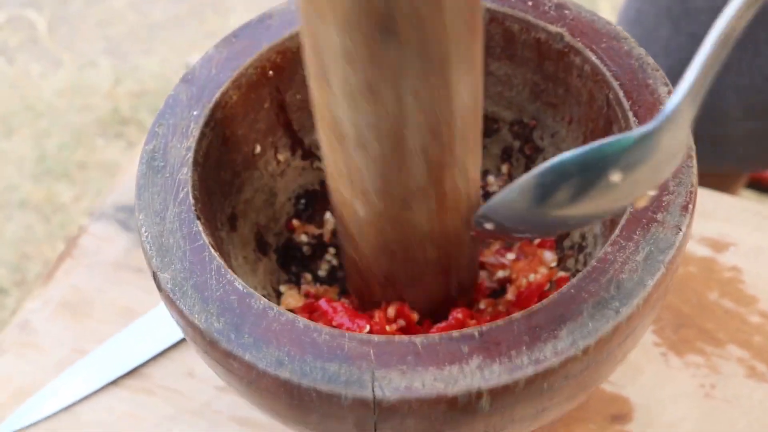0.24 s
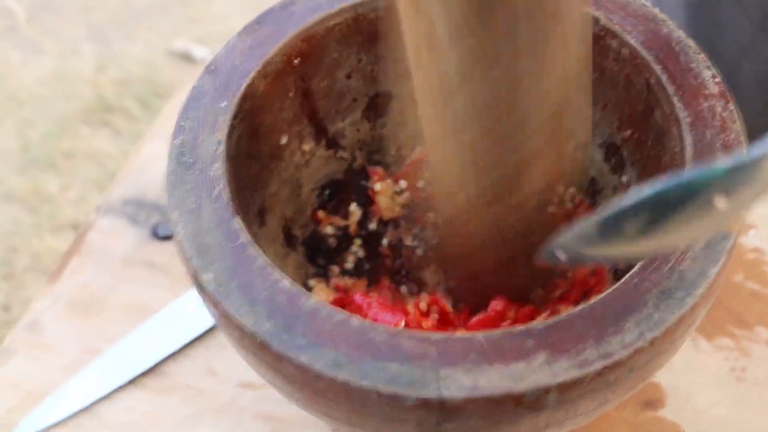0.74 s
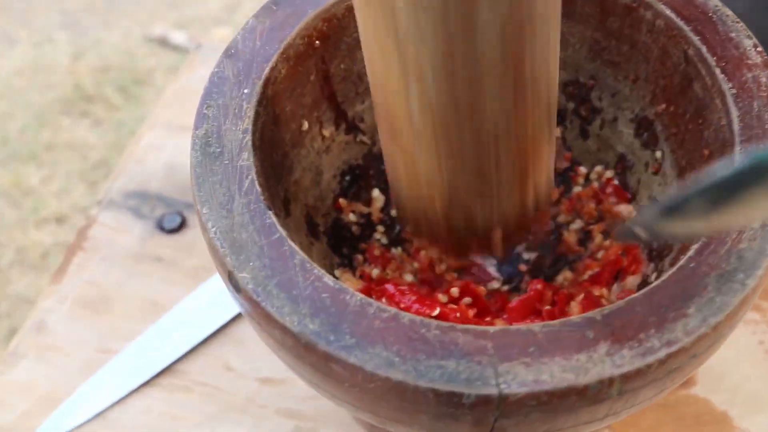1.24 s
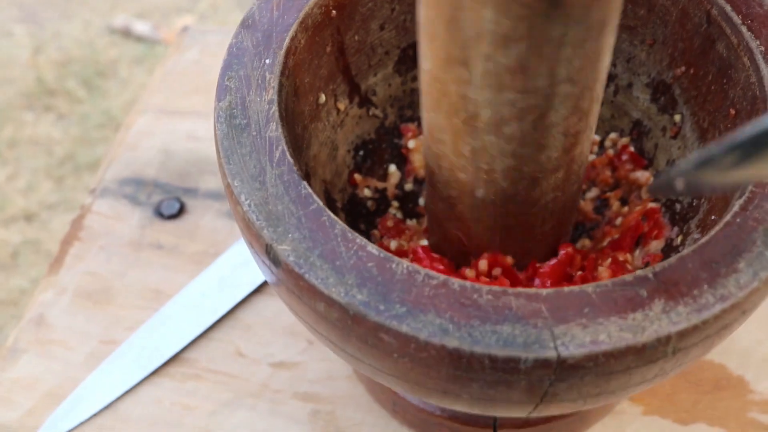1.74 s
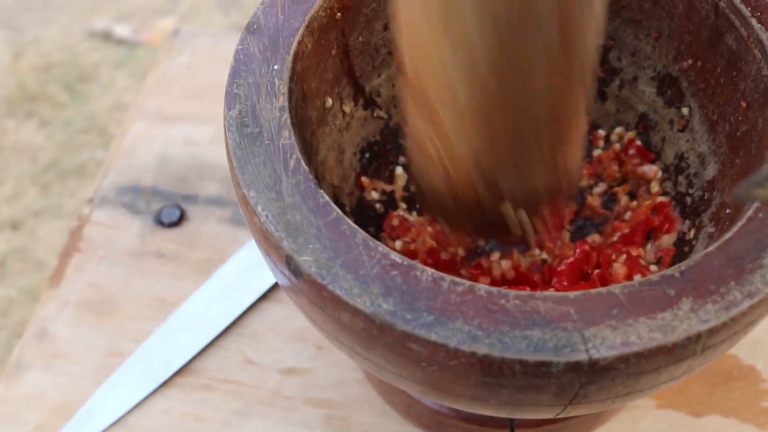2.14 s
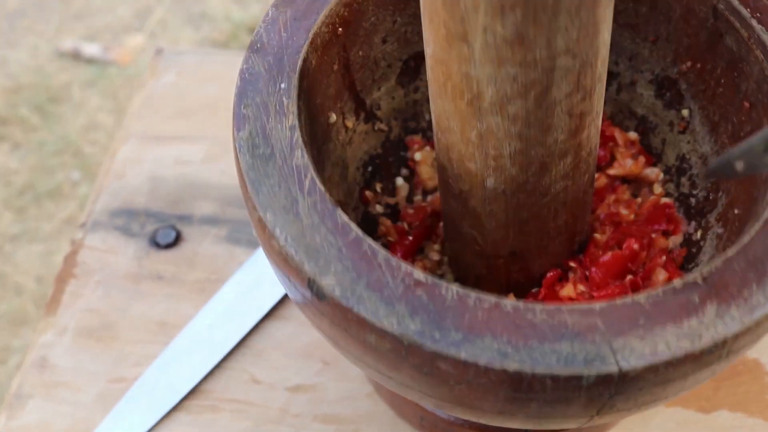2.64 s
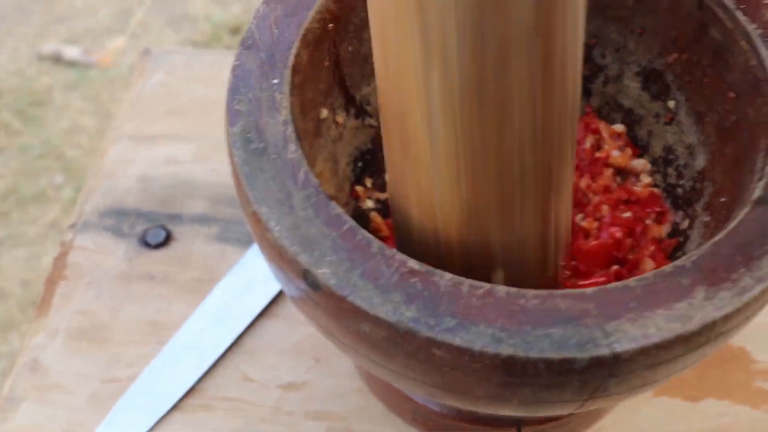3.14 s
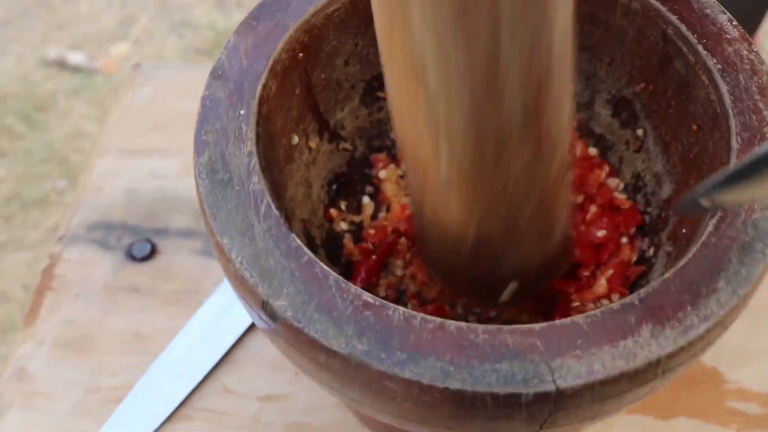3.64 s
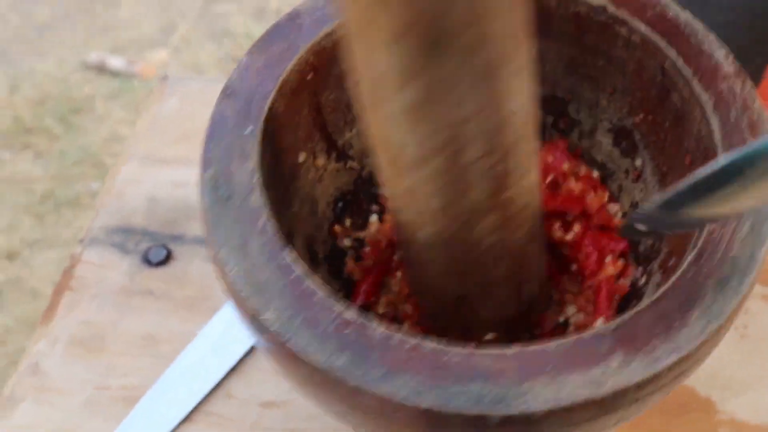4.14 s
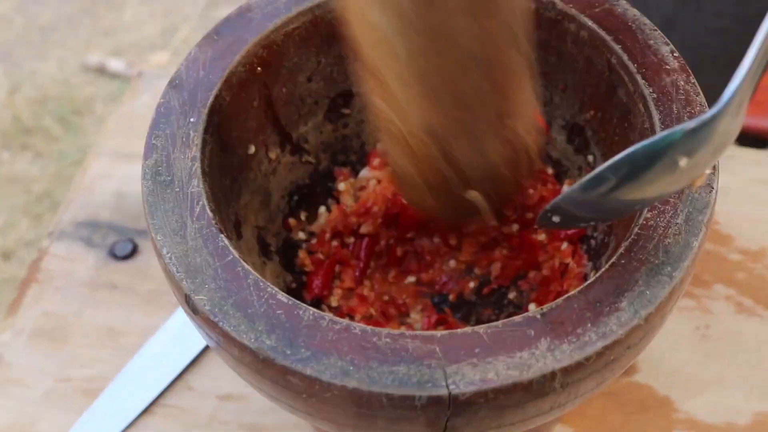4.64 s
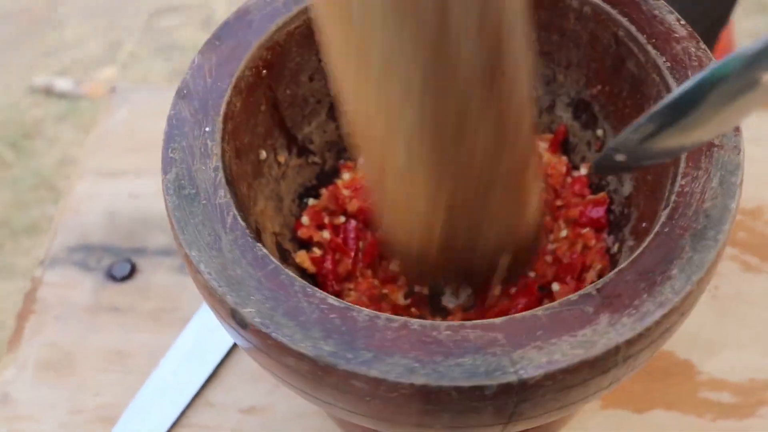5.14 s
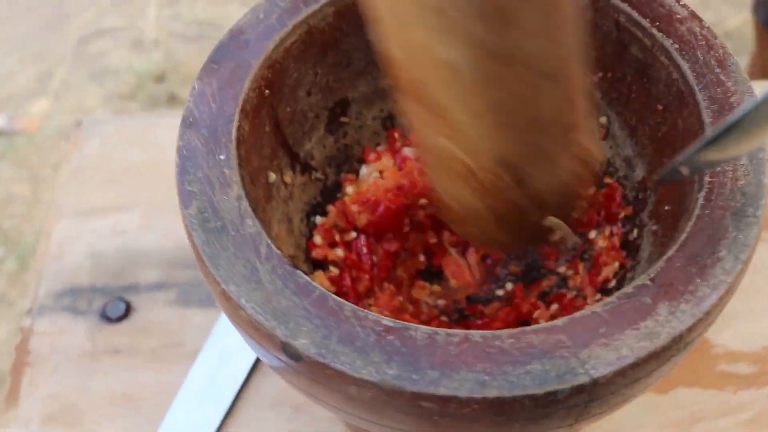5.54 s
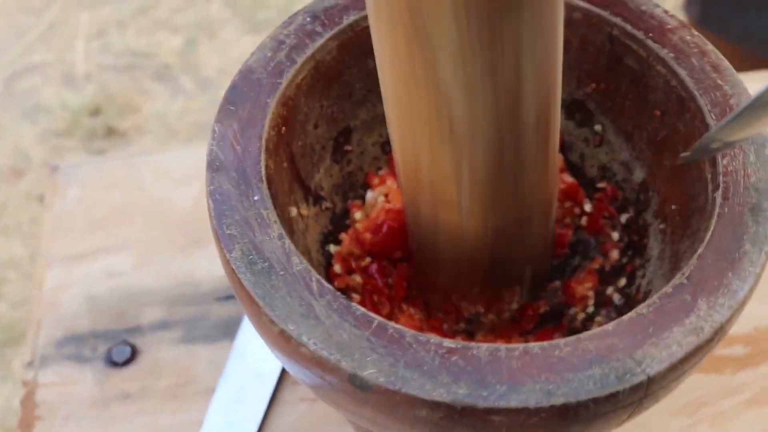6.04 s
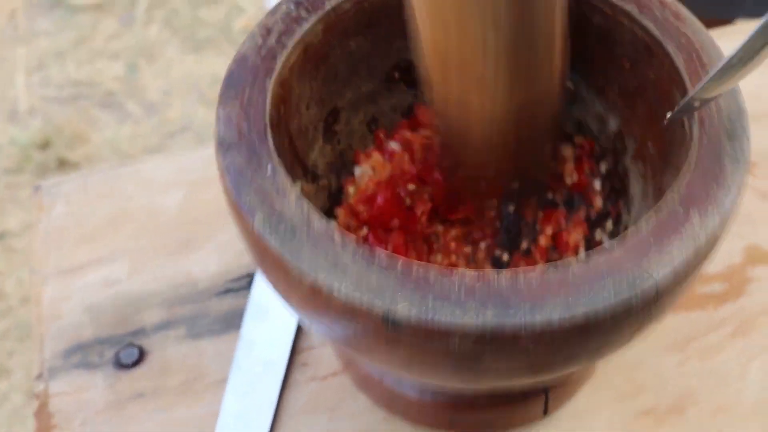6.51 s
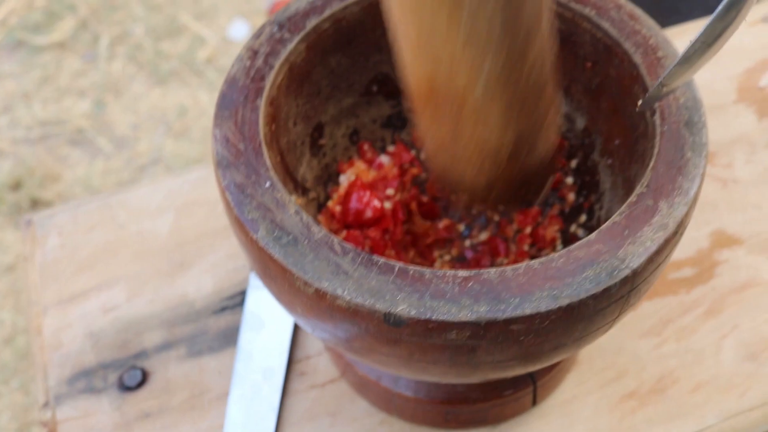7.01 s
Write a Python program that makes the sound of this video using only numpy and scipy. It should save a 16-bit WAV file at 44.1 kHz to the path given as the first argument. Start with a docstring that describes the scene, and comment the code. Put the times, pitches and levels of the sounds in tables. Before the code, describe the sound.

Steady pounding in a wooden bowl: firm, dry knocks at first, then softer, uneven, more grinding strokes, and firmer again near the end. Wet pulp and seeds crackle under each stroke, and a loose blade gives tiny bouncing clinks on the planks. Close stereo microphones outdoors, with little reverberation, faint bird cheeps, a low far engine early on and gentle air noise.

```python
"""On a plank table outdoors, a wooden pestle pounds chilies and garlic in a wooden mortar, heard close up.
Strokes crush wet pulp in filtered crackle; blows ring the modes of bowl and planks; a knife on the planks
rattles in bouncing clinks. Far off, small birds cheep in gliding sines, and an engine drones as a
wavering tone with its octave, then fades into the shaped noise of open air."""
import sys
import numpy as np
from scipy import signal
from scipy.fft import rfft, irfft, next_fast_len
from scipy.io import wavfile
from scipy.ndimage import uniform_filter1d

SR = 44100
rng = np.random.default_rng(int(sys.argv[2]) if len(sys.argv) > 2 else 0)


def gain_from_db(level_db):
    """Convert decibel levels to linear amplitude factors (20 dB per decade)."""
    decades = np.asarray(level_db, float) / 20
    return 10 ** decades


def digitize_waveform(pressure):
    """Quantize a signal to 16-bit integers and store it at the path in sys.argv[1].

    Rows of a 2-D input are taken as channels; values are limited to [-1, 1].
    """
    field = np.atleast_2d(pressure).T
    bounded = np.clip(field, -1, 1)
    quanta = np.round(bounded * 32767).astype(np.int16)
    wavfile.write(sys.argv[1], SR, quanta)


N = 320600  # length in samples

# pestle strokes: start_s, deepest_s, entry_db (above the deepest point), crush_db, grind_db (above crush_db)
STROKES = [(0, -0.014, -4, -69.5, 10.5), (0.283, 0.31, 5.5, -50, -2), (0.579, 0.589, 16, -50.5, -2),
           (0.864, 0.892, -3, -52, -2), (1.186, 1.189, 9, -42.5, -4.5), (1.482, 1.481, 2.5, -41.5, -7.5),
           (1.79, 1.801, 8, -45, -1), (2.084, 2.11, -8, -51, -20), (2.409, 2.435, -17.5, -49.5, -1),
           (2.71, 2.751, -11.5, -47, -5.5), (3.005, 3.048, -22, -44, -2), (3.298, 3.347, -13.5, -46.5, -1),
           (3.604, 3.652, -20.5, -46, 2.5), (3.904, 3.934, -22, -46.5, 7.5), (4.2, 4.223, -10.5, -52.5, 4),
           (4.515, 4.533, -1.5, -52.5, -2.5), (4.807, 4.839, -19, -52.5, -6.5), (5.125, 5.137, 5, -48.5, 1),
           (5.428, 5.458, 1.5, -53, -1.5), (5.742, 5.772, 3.5, -51, 9), (6.03, 6.057, -12.5, -48.5, 4),
           (6.337, 6.347, -9, -49.5, 5), (6.65, 6.675, -0.5, -50, 3), (6.952, 6.978, -2, -50, 8.5),
           (7.246, 7.21, 7, -44.5, 6)]
# resonances of bowl and pestle: pitch_hz, level_db, t60_s
BOWL_MODES = [(450, 0.5, 0.034), (547, 4, 0.031), (681, 4, 0.051), (741.5, 8, 0.037), (843.5, -14, 0.12),
              (1043.4, 2.5, 0.048), (1279.5, -2.5, 0.049), (1505, -6, 0.053), (1777, -4, 0.04),
              (1950, -5.5, 0.01), (2480, -19, 0.035), (2787, -14, 0.035), (3120, -20.5, 0.025)]
# resonances of the table planks: pitch_hz, level_db, t60_s
PLANK_MODES = [(117, -10, 0.033), (203, -3.5, 0.02), (255.3, 12.5, 0.019), (307.6, -1, 0.059)]


def evened(x):
    """Scales to rms 1."""
    return x / np.sqrt(np.mean(x ** 2) + 1e-20)


def read(points, hz):
    """Reads a curve at the given frequencies, on a logarithmic pitch axis."""
    point_hz, value = np.transpose(points)
    return np.interp(np.log(hz + 1), np.log(point_hz + 1), value)


def coloured(x, points, factor=1):
    """Filters x by a spectrum in dB, scaled by the factor."""
    length = x.shape[-1]
    size = next_fast_len(length)
    gain = gain_from_db(factor * read(points, np.fft.rfftfreq(size, 1 / SR)))
    return irfft(rfft(x, size) * gain, size)[..., :length]


def add(mix, start_s, sound):
    """Mixes a sound in at a time."""
    part = mix[..., round(start_s * SR):][..., :sound.shape[-1]]
    part += sound[..., :part.shape[-1]]


def ring(modes, strike_db=0, detune=1, rise=0.00071):
    """Struck wood or metal: decaying sines, each with its own strength, rising in `rise` s; peak 1."""
    pitch_hz, level_db, t60_s = np.transpose(modes)[:, :, None]
    t = np.arange(SR // 3) / SR
    decay = gain_from_db(level_db + strike_db - 60 * t / t60_s)
    sound = (decay * np.sin(2 * np.pi * pitch_hz * detune * t)).sum(0)
    sound = sound * (1 - np.exp(-t / rise))
    return sound / abs(sound).max()


def crackle(per_s, spread_db, hiss):
    """Random clicks, a few of them large, over a smooth hiss."""
    size = gain_from_db(spread_db * np.minimum(rng.exponential(1, N), 4)) * rng.standard_normal(N)
    clicks = size * (rng.random(N) < per_s / SR)
    return evened(clicks) + hiss * rng.standard_normal(N)


def snaps(count, seconds):
    """Broad cracks of contact noise, dying away exponentially."""
    t = np.arange(SR // 3) / SR
    spectrum = [(600, -14.5), (2500, -2), (5000, 0.5), (16000, -21)]  # pitch_hz, level_db
    noise = coloured(rng.standard_normal((count, len(t))), spectrum)
    return noise * np.exp(-t / seconds)


def pressure(fade, grinding):
    """Each stroke bites at once, moves from its entry level to its deepest point, then lets go."""
    release_db_per_s, lift_db, lift_s = 259, 4.5, 0.045  # at fade 1: steady fall, plus a quick first drop
    out, t = np.zeros(N), np.arange(SR // 2) / SR
    for start_s, deepest_s, entry_db, crush_db, grind_db in STROKES:
        press_s = max(deepest_s - start_s, .002)
        after_s = np.maximum(t - press_s, 0)
        released_db = release_db_per_s * after_s + lift_db * (1 - np.exp(-after_s / lift_s))
        shape_db = entry_db * np.maximum(1 - t / press_s, 0) - fade * released_db
        bite = 1 - np.exp(-t / 0.0015)
        add(out, start_s, gain_from_db(crush_db + grinding * grind_db + shape_db) * bite)
    return out


def crushing():
    """Skins and seeds burst in a wet, clumped crackle, the fine bits fading fastest; grinding shakes the wood."""
    # crushed bits by size: pitch_hz, width_hz, level_db, fade (factor on the stroke's release)
    bit_sizes = [(456, 463, -1.5, 0.59), (1060, 1600, 0.5, 0.89), (2360, 2120, -1, 1.04),
                 (3720, 3600, -9.5, 0.71), (5300, 7200, -5, 1.4), (7800, 9000, -1, 1.59),
                 (9700, 1200, -11, 1.2), (13500, 3300, -32, 1.7)]
    clumps = gain_from_db(2.5 * evened(uniform_filter1d(rng.standard_normal(N), size=200)))
    seeds = crackle(500, spread_db=3.5, hiss=0)  # a seed snaps in all sizes at once
    pulp = 0
    for pitch_hz, width_hz, level_db, fade in bit_sizes:
        bursts = crackle(2500, spread_db=2.8, hiss=.6) + .8 * seeds
        edges_hz = [pitch_hz - width_hz / 2, pitch_hz + width_hz / 2]
        bits = signal.lfilter(*signal.butter(2, edges_hz, "band", fs=SR), bursts)
        pulp = pulp + gain_from_db(level_db) * evened(bits) * pressure(fade, grinding=0)
    shoves = pressure(.75, grinding=1) * crackle(600, spread_db=2.5, hiss=.5)
    rocking = crackle(70, spread_db=2.8, hiss=.03)  # the bowl settles in small bumps
    shoves += gain_from_db(-15.0) * pressure(0.29, grinding=0.35) * rocking
    soft_db = -5.0 * np.log2(np.array(BOWL_MODES)[:, :1] / 700)  # weaker high modes
    body = ring(BOWL_MODES, soft_db) + gain_from_db(-8.0) * ring(PLANK_MODES)
    return clumps * pulp + signal.oaconvolve(shoves, body / np.linalg.norm(body))[:N]


def murmur():
    """Wind and distance: noise shaped in pitch, drifting in patches, partly alike at left and right."""
    # spectrum of the open air: pitch_hz, level_db
    spectrum = [(18, -39), (30, -11.5), (86, 3.5), (454, -6), (730, -3.5), (902, -24.5), (1030, -9),
                (1990, -15), (2460, -12.5), (4390, -19.5), (10800, -30.5), (16400, -55)]
    # slow course of the air's level: time_s, level_db
    swell = [(0, -14.5), (2, -14.5), (4, -14.5), (7.3, -19.5)]
    # left-right likeness of the air: pitch_hz, likeness (0-1)
    likeness = [(60, 0.96), (600, 0.82), (2000, 0.01), (8000, 0.06)]
    frames, hz = N // 256 + 5, np.fft.rfftfreq(1024, 1 / SR)
    a, b, c, d, patches = rng.standard_normal((frames, 513, 5)).T
    patches = uniform_filter1d(patches, size=10, axis=0)
    patches = evened(uniform_filter1d(patches, size=14, axis=1))
    same = np.clip(read(likeness, hz), -1, 1)[:, None]
    left = a + 1j * b
    right = same * left + np.sqrt(1 - same ** 2) * (c + 1j * d)
    bins = np.array([left, right]) * gain_from_db(read(spectrum, hz)[:, None] + 2 * patches)
    wash = evened(signal.istft(bins, nperseg=1024, noverlap=768)[1][:, :N])
    return gain_from_db(-57.5 + np.interp(np.arange(N) / SR, *np.transpose(swell))) * wash


def engine():
    """A distant engine: a sine and its equally loud octave, wavering together in pitch."""
    # the engine's path: time_s, pitch_hz, level_db
    drone = [(0, 73.5, -78), (1.199, 79, -82.5), (2.501, 88.6, -78), (3.4, 86.7, -76), (3.701, 83.7, -85.5),
             (7.3, 83, -99)]
    t = np.arange(N) / SR
    time_s, pitch_hz, level_db = np.transpose(drone)
    waver = evened(uniform_filter1d(rng.standard_normal(N), size=4000))
    turns = np.cumsum(np.interp(t, time_s, pitch_hz) * (1 + .025 * waver)) / SR
    note = np.sin(2 * np.pi * turns) + np.sin(4 * np.pi * turns)
    return gain_from_db(np.interp(t, time_s, level_db)) * note


def rattles():
    """A scratchy contact and short clink of the blade, two smaller bounces, a new angle for each hop."""
    # clear hops of the knife on the planks: start_s, level_db
    clear_hops = [(0.1376, -64), (0.409, -46.5), (0.5881, -26), (0.624, -39), (0.6584, -44), (0.7023, -67),
                  (0.9433, -45.5), (1.0006, -51.5), (1.201, -22), (1.256, -42.5), (1.3074, -58),
                  (1.5083, -24), (1.5376, -39), (1.6012, -56), (1.6627, -54.5), (1.8038, -27),
                  (1.8589, -63), (2.1105, -27.5), (2.1655, -52), (2.381, -48.5), (2.5256, -41),
                  (2.6, -53.5), (2.7382, -33.5), (2.806, -50.5), (3.044, -32.5), (3.126, -37),
                  (3.1444, -55), (3.3336, -37.5), (3.3467, -46), (3.41, -41), (3.7266, -40),
                  (3.7698, -51.5), (4.0222, -48.5), (4.0427, -57.5), (4.0855, -65), (4.298, -58),
                  (4.6698, -55), (4.974, -53.5), (5.129, -30.5), (5.236, -57), (5.7746, -58),
                  (5.8277, -50.5), (6.0616, -23.5), (6.4198, -50), (6.4657, -59.5), (6.6794, -63),
                  (6.706, -47), (6.7494, -63.5), (6.784, -60), (7.0904, -62)]
    # resonances of the knife: pitch_hz, level_db, t60_s
    knife_modes = [(2480, -6, .02), (3700, -3, .015), (4300, 0, .018), (4750, -2, .012), (5150, -2, .015),
                   (5700, -5, .012)]
    # free end of the blade left singing after a hop: start_s, pitch_hz, level_db
    singing = [(0.139, 2480, -85), (.3, 5000, -71), (1.539, 2430, -70), (2.109, 6200, -74),
               (3.049, 6100, -73), (3.351, 6150, -72), (5.139, 5300, -84)]
    out = np.zeros((2, N))
    nudge = ring(BOWL_MODES, -3 * np.log2(np.array(BOWL_MODES)[:, :1] / 700))  # the hop also nudges the bowl
    # one more faint hop about a tenth of a second after every stroke but the final one
    hops = clear_hops + [(stroke[0] + rng.uniform(0.077, 0.11), -68.5) for stroke in STROKES[:-1]]
    chance = rng.standard_normal((len(hops), 3, len(knife_modes), 1))
    for (start_s, level_db), (strength, bend, angle), snap in zip(hops, chance, snaps(len(hops), .0015)):
        clink_db = -2 - .5 * max(level_db + 48.5, 0)  # hard hops are mostly slap, with less clink
        clink = ring(knife_modes, 2.5 * strength, 1 + 0.0077 * bend)
        hop = gain_from_db(clink_db) * clink + 0.8 * snap + gain_from_db(-6.5) * nudge
        gap_s = .008 + .001 * angle[2, 0]
        for bounce in range(3):
            side_db = level_db - 9 * bounce + 1.5 * angle[:2]  # left and right differ
            add(out, start_s + bounce * gap_s, gain_from_db(side_db) * hop)
    for start_s, pitch_hz, level_db in singing:
        add(out, start_s, gain_from_db(level_db) * ring([(pitch_hz, 0, .45)], rise=.005))
    return out


def birds():
    """Each whistle is a slightly rough sine gliding to a turning pitch and on; far echoes smear it."""
    # a small bird's two-voiced cheeps: start_s, level_db
    cheeps = [(0.149, -77.5), (0.223, -74), (1.302, -74.5), (1.374, -72.5), (1.702, -80.5), (1.952, -71.5),
              (2.028, -81), (4.148, -71.5), (4.289, -85.5), (5.298, -74.5), (5.377, -70.5)]
    # the two notes of a cheep: delay_s, length_s, start_hz, turn_hz, end_hz, level_db (to the cheep)
    voices = [(0, 0.032, 3995, 5990, 5650, -2), (0.02, .05, 3670, 5890, 3620, -0.2)]
    # single whistles of other birds: start_s, length_s, start_hz, turn_hz, end_hz, level_db
    whistles = [(1.328, .16, 1790, 2140, 1830, -78.5), (3.446, .067, 2170, 2110, 1950, -76),
                (6.218, .1, 4200, 4040, 3400, -92)]
    out = np.zeros(N)
    notes = [(start_s + delay_s, *shape, level_db + voice_db)
             for start_s, level_db in cheeps for delay_s, *shape, voice_db in voices]
    for start_s, length_s, start_hz, turn_hz, end_hz, level_db in notes + whistles:
        u = np.linspace(0, 1, round(length_s * SR))
        before_turn = u < .35
        bend = np.where(before_turn, 1 - u / .35, (u - .35) / .65) ** 1.4
        hz = turn_hz - np.where(before_turn, turn_hz - start_hz, turn_hz - end_hz) * bend
        rough_hz = hz + 150 * rng.standard_normal(len(u))
        tone = np.sin(2 * np.pi * np.cumsum(rough_hz) / SR)
        add(out, start_s, gain_from_db(level_db) * signal.windows.tukey(len(u), .2) * tone)
    tail = rng.standard_normal((2, 8000)) * np.exp(-np.arange(8000) / SR / .05)
    echoes = signal.oaconvolve(out[None], tail / np.linalg.norm(tail[0]), axes=1)[:, :N]
    return out + gain_from_db(3.0) * echoes


def knocks():
    """Hard blows crack and reach high modes; mode strengths and pitch vary at random from blow to blow."""
    # pestle or bowl foot meeting wood: start_s, level_db, thud_db (to level_db), hardness (dB per octave)
    blows = [(0.2871, -17.5, -8, -5), (0.4796, -45.5, -20, 0), (0.5816, -18, -6, -3.5),
             (0.8745, -28, -3.5, -5.5), (1.1896, -13.5, -10, 1.5), (1.2041, -20, -36, -15),
             (1.4871, -17.5, -8.5, -8), (1.792, -12.5, -10, -2.5), (1.7977, -16, -22, 7),
             (2.0966, -43.5, 14, 6.5), (2.1108, -37, -25, -16), (2.1378, -28, -11, -10.5),
             (2.3802, -39.5, -26, 13), (2.449, -30, -11, -7), (2.7267, -34.5, -13, 36),
             (2.7443, -19.5, -11, -0.5), (2.764, -22.5, -40, -4), (3.0465, -23.5, -10.5, 9.5),
             (3.0607, -25, -27, -7), (3.3055, -31, -12.5, -2.5), (3.3391, -19, -15, -4.5),
             (3.652, -33.5, -10, 8), (3.903, -28, -22, 2.5), (3.9465, -26, -10.5, 0), (4.5219, -46, 2, -9),
             (4.5347, -26, -19, -3), (4.8289, -43.5, 3.5, 0), (4.9158, -43.5, -14.5, -11),
             (4.974, -50.5, -16.5, 7), (5.1294, -37.5, -2.5, 3), (5.1721, -25, -17, -2.5),
             (5.4552, -23, -12, -3.5), (5.5505, -42.5, -30, -12.5), (5.747, -24, -6.5, 1),
             (5.7793, -25, -35, -1), (5.82, -32.5, -26, -15), (5.9741, -43, -8, -6.5),
             (6.037, -21, -12, -3.5), (6.0651, -20.5, -27, -2), (6.1354, -40.5, -20, -2),
             (6.3569, -29.5, -26.5, -17.5), (6.644, -14, -28, 6), (6.6762, -30.5, -25, 0),
             (6.9559, -24.5, -15.5, 10), (6.9858, -27.5, -35, 1), (7.0246, -38.5, -21, 13),
             (7.2492, -20, -18.5, 2)]
    vary_db, vary_pitch = 4.5, 0.023  # random spread of mode strengths (dB) and of pitch (share)
    out, pitch_hz = np.zeros(N), np.array(BOWL_MODES)[:, :1]
    chance = rng.standard_normal((len(blows), len(BOWL_MODES) + 1, 1))
    punch = 0.56 + 0.27 * np.exp(-np.arange(SR // 3) / SR / 0.003)  # the pestle stays down and damps the ring
    for (start_s, level_db, thud_db, hardness), draw, crack in zip(blows, chance, snaps(len(blows), 0.017)):
        strike_db = hardness * np.log2(pitch_hz / 700) + vary_db * draw[1:]
        bowl = punch * ring(BOWL_MODES, strike_db, 1 + vary_pitch * draw[0])
        crack_db = -28.5 + 2 * min(hardness, 0)  # soft blows crack less
        thud = gain_from_db(thud_db) * ring(PLANK_MODES, rise=.0015)
        add(out, start_s, gain_from_db(level_db) * (bowl + gain_from_db(crack_db) * crack + thud))
    return out


def near_echoes(x):
    """Short random echoes scatter the treble differently to each microphone, crossfading from path to path."""
    # colour of the near echoes: pitch_hz, level_db (to the direct sound)
    scatter = [(200, -17), (700, -12), (1500, 0), (3000, 5.5), (8000, 1.5), (15000, -4)]
    step, out = np.arange(N) / SR / .011, x  # one crossfade every 11 ms, around 16 paths
    for path in range(16):
        taps = rng.standard_normal((2, 400)) * np.exp(-np.arange(400) / SR / .0005)
        taps = np.pad(taps / np.linalg.norm(taps[0]), ((0, 0), (100, 300)))
        taps = coloured(taps, scatter)[:, 90:]
        window = np.sqrt(np.maximum(1 - abs((step - path) % 16 - 1), 0))
        out = out + signal.oaconvolve(x * window, taps, axes=1)[:, :N]
    return out


def scene():
    """The small mortar sends out no deep bass; it stands to the right, so the left hears it two samples late."""
    no_bass = signal.butter(3, 105, "high", fs=SR, output="sos")
    mortar = signal.sosfilt(no_bass, crushing() + knocks())
    pair = np.array([np.roll(mortar, shift=2), mortar]) + rattles()
    return near_echoes(pair) + birds() + murmur() + engine()


def top_cut(x):
    """Nothing passes above the cut-off."""
    return signal.sosfilt(signal.butter(12, 16570, fs=SR, output="sos"), x)


def record(dry):
    """The microphone pair leans left around 1 kHz and right in the treble."""
    # lean of the pair: pitch_hz, left_over_right_db
    lean = [(100, 0), (1000, 1), (2400, 0.5), (8000, -2.5), (15000, -1)]
    pair = np.array([coloured(dry[0], lean, .5), coloured(dry[1], lean, -.5)])
    return top_cut(pair)


dry = scene()
out = record(dry)
digitize_waveform(out)
```